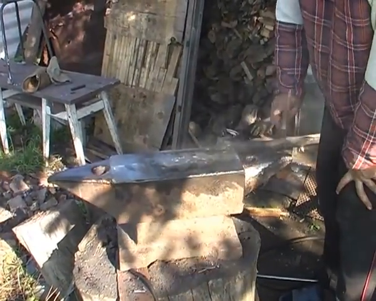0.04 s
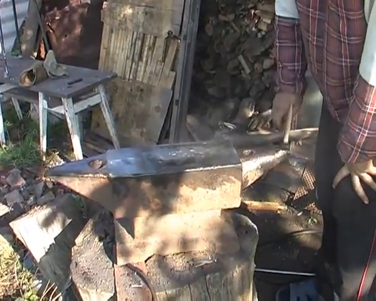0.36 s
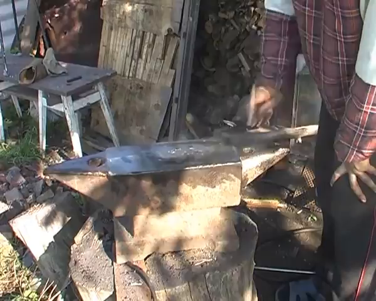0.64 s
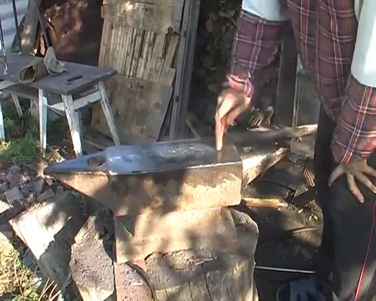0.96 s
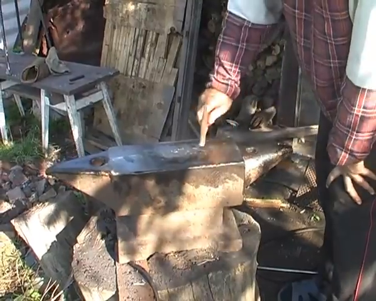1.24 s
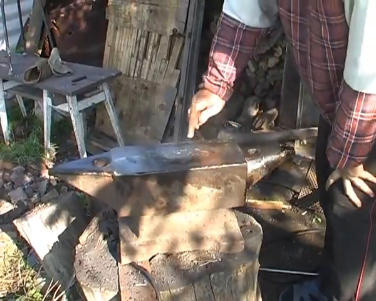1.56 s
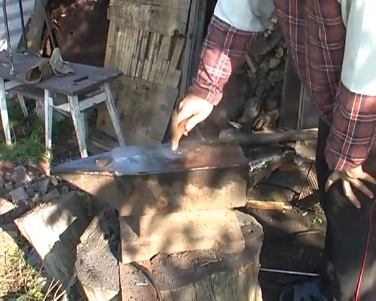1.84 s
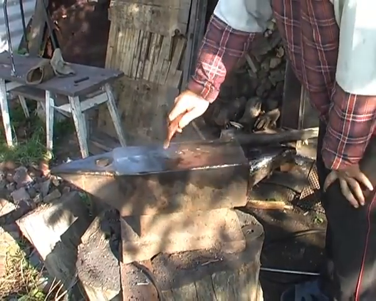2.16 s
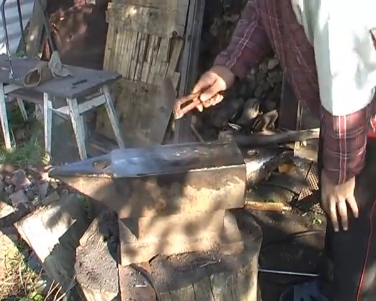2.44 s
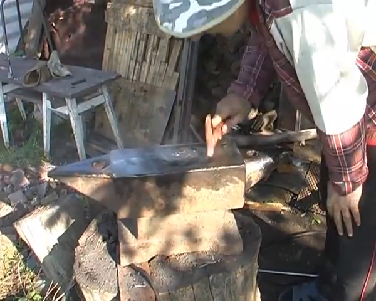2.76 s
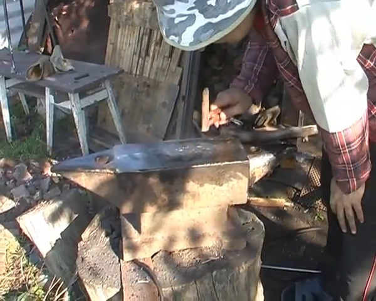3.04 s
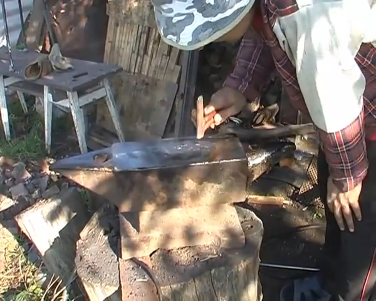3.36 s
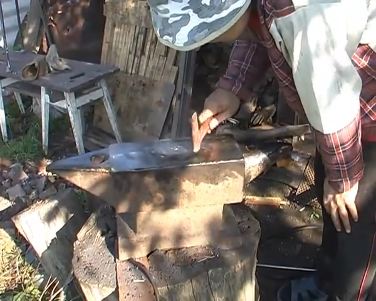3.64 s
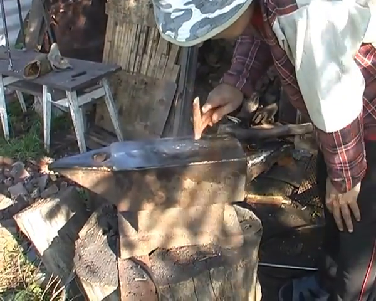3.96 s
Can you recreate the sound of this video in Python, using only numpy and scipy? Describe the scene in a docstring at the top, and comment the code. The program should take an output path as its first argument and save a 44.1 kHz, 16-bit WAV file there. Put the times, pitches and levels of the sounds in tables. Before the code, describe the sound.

Steel tool tapping repeatedly on an anvil outdoors, each sharp tick leaving a high ring.

```python
"""An anvil in a yard, tapped with a hand-held steel tool, first on the thin heel, then on the face.
Each tap gives a tick, a short clank and a long ring whose mix depends on the spot that is struck.
The taps briefly overload the recorder: its gain ducks and recovers, so the ring swells after the hit.
Behind them lie outdoor air, the faint rustle of the smith shifting about and one soft footfall."""
import sys
import numpy as np
from scipy import signal
from scipy.fft import rfft, irfft
from scipy.io import wavfile
from scipy.ndimage import minimum_filter1d

SR = 44100
rng = np.random.default_rng(int(sys.argv[2]) if len(sys.argv) > 2 else 0)


def log_audio(samples):
    """Write samples as a 16-bit WAV file to the path given in sys.argv[1]."""
    # one column per channel
    frames = np.atleast_2d(samples).T
    # limit to full scale, then quantise
    limited = np.clip(frames, -1, 1)
    pcm = np.round(limited * 32767).astype(np.int16)
    wavfile.write(sys.argv[1], SR, pcm)


N = 176400
PRE_ROLL = SR // 5   # samples ahead of time zero, so the scene opens on a ringing anvil
TOTAL = N + PRE_ROLL
TIME = (np.arange(TOTAL) - PRE_ROLL) / SR

# The taps. Each row: start in seconds, then the drive in dB of the tick and of the mode groups
# hum, whine, chime, shimmer, clang, clank, knock and ping.
TAPS = [ (-.085, -3, -9.5, -13, -15, -33.5, 4, -14, -30, -16),
        (0.1888, -0.5, -5.5, -10.5, -12, -26.5, 2, -12, -38, -16),
        (0.4412, 0.5, -6, -12, -11.5, -28.5, 3, -17, -18.5, -18),
        (0.7818, -9, -15.5, -14.5, -10, -44, -18, -13.5, -12.5, -10),
        (1.019, -7.5, -34.5, -20.5, -14.5, -52, -23.5, -16, -9, -16.5),
        (1.2421, -7, -38.5, -37, -12, -41, -18, -11, -10, -16),
        (1.4665, -10, -29.5, -35, -13.5, -55, -18.5, -12, -12, -13.5),
        (1.7059, -7, -27, -29, -18.5, -45, -27, -15.5, -13.5, -22.5),
        (1.923, -6.5, -30, -27, -19.5, -40.5, -38, -13, -10, -22),
        (2.1451, -4, -27.5, -25, -18, -31.5, -25, -7.5, -11.5, -16),
        (2.834, -7.5, -34.5, -33, -13, -46, -21, -14.5, -15.5, -15.5),
        (3.217, -8.5, -29, -42, -11.5, -38, -22, -11.5, -17.5, -21.5),
        (3.4741, -6.5, -26.5, -30.5, -18.5, -39, -21.5, -15.5, -16.5, -39),
        (3.6719, -4.5, -24.5, -26.5, -13, -36.5, -21.5, -15, -21.5, -9),
        (3.8869, -2.5, -26, -30, -13.5, -46, -20, -11.5, -16.5, -11.5)]
# Modes of anvil and tool, grouped as they are driven together.
# Each row: pitch in Hz, level in dB added to the group's drive, time to fall 60 dB in seconds.
STEEL_MODES = { "hum": [(2510.7, 1.5, 1), (5932, -4, 1.32)], "whine": [(5086, 0, 1.3), (5020, -15, 0.92),
               (6323, -22, 0.65)], "chime": [(5533.6, -0.5, .48), (5566, -6, .25), (8903, -13.5, 0.26),
               (8300, -27, 0.16), (10893, -19, 0.27), (12900, -25, 0.26)], "shimmer": [(2720, -1, 1.19),
               (9226, 1, 0.54), (9337, 0.5, 0.52)], "clang": [(3013, 0.5, 0.2), (4460, -10.5, 0.2),
               (4600, -41, 0.52), (11023, -12.5, 0.11), (6980, -18, 0.23)], "clank": [(4734, 3.5, 0.16),
               (6943, 0.5, .15), (4265, -6, 0.15), (4782, -3, 0.14), (1411, -13, 0.19), (3500, -16, 0.17),
               (7200, -5.5, .16), (9300, -14.5, 0.21), (9840, -12.5, 0.14), (13060, -18, 0.16)],
               "knock": [(2025, 1, 0.091)], "ping": [(7993, 4, 0.065), (8170, -13.5, 0.36)]}
# High overtones, in a new mix at every tap. Each row: pitch in Hz, level in dB added to the tick's drive.
OVERTONES = [(6650, -30), (6790, -31), (7738, -32), (8039, -37), (9065, -36.5), (10125, -32), (10460, -36),
             (11480, -43), (12050, -30), (13120, -40), (14300, -43)]
# Noise colours. Each row: frequency in Hz, relative spectral density in dB.
TICK_COLOUR = [(60, -29.5), (300, -31), (600, -30), (900, -12), (1200, 2), (1650, -18), (2300, 5),
               (3500, -1), (5500, -11), (9000, -1.5), (12000, -10), (16000, -33.5)]
YARD_ECHO_COLOUR = [(100, -20), (600, -13.5), (1200, -6.5), (2300, -1.5), (4700, 1.5), (8000, -7.5),
                    (11000, -13), (16000, -36)]
AIR_COLOUR = [(25, -3.5), (60, -1.5), (120, -4.5), (260, 1.5), (500, -2.5), (1000, -7.5), (2000, -14),
              (5000, -7), (9000, -12.5), (13000, -23), (16000, -46)]
RUSTLE_COLOUR = [(100, -37), (300, -5.5), (800, -9), (1500, -4), (2600, -9), (5000, -10), (9000, -18),
                 (15000, -35)]
# The rise and fall of the smith's rustling. Each row: time in seconds, level in dB.
RUSTLE_FADER = [(0, -45), (.38, -38), (.55, -42), (.72, -44), (1.3, -48.5), (1.45, -40), (1.58, -37.5),
                (1.85, -45), (2.2, -54.5), (2.8, -48.5), (3.08, -45), (3.3, -51.5), (4, -50.5)]
# Stereo width of the noises. Each row: frequency in Hz, side level against mid in dB.
STEREO_WIDTH = [(100, -35), (3000, -49), (6000, -31.5), (10000, -4.5)]


def from_db(db):
    """Decibels to gain."""
    return 10 ** (np.asarray(db) / 20)


def decay(age, t60):
    """An envelope that opens at age zero and falls 60 dB in t60 seconds."""
    return (age >= 0) * np.exp(-np.log(1000) * np.clip(age / t60, 0, 10))


def smooth(x, seconds):
    """One-pole low-pass."""
    pole = np.exp(-1 / (seconds * SR))
    return signal.lfilter([1 - pole], [1, -pole], x)


def eq_gain(curve, hz):
    """Gain of an EQ curve drawn on a log-frequency axis."""
    points_hz, points_db = np.transpose(curve)
    return from_db(np.interp(np.log(hz + 1), np.log(points_hz), points_db))


def noise(colour):
    """Coloured stereo noise of rms 1, nearly mono below the high treble."""
    hz = np.fft.rfftfreq(TOTAL, 1 / SR)
    mid, side = rfft(rng.standard_normal((2, TOTAL))) * eq_gain(colour, hz)
    stereo = irfft(mid + side * eq_gain(STEREO_WIDTH, hz) * [[1], [-1]], TOTAL)
    return stereo / stereo.std()


def contact_ticks(rise_s=0.0009, tick_t60_s=0.025, echo_t60_s=0.21, echo_db=-16.5):
    """The crack of steel on steel, with a faint tail scattered back by sheds and woodpile."""
    crack, tail = np.zeros((2, TOTAL))
    for start_s, drive_db, *_ in TAPS:
        start = int(start_s * SR) + PRE_ROLL
        age = np.arange(TOTAL - start) / SR
        attack = from_db(drive_db) * np.minimum(age / rise_s, 1)
        crack[start:] += attack * decay(age, tick_t60_s)
        tail[start:] += attack * decay(age, echo_t60_s)
    return crack * noise(TICK_COLOUR) + from_db(echo_db) * tail * noise(YARD_ECHO_COLOUR)


def struck_mode(hz, t60, levels_db, scatter_db=0, pan_db_per_khz=0.16, grip_cycles=0.54):
    """One mode of the steel: each tap stops the old vibration and sets it ringing anew."""
    starts = np.append((np.array(TAPS)[:, 0] * SR).astype(int) + PRE_ROLL, TOTAL)
    ring = np.zeros((2, TOTAL))
    for start, end, db in zip(starts, starts[1:], levels_db):
        scatter, pan, polarity, grip = rng.standard_normal(4)
        age = np.arange(end - start) / SR
        pan_db = pan * pan_db_per_khz * hz / 1000 * np.array([[.5], [-.5]])
        detune_hz = grip * grip_cycles / t60   # the grip shifts strongly damped modes most
        tone = np.sign(polarity) * np.cos(2 * np.pi * (hz + detune_hz) * age)
        ring[:, start:end] = from_db(db + scatter_db * scatter + pan_db) * tone * decay(age, t60)
    return ring


def waver(depth_db=1.3, swing_s=0.03):
    """A slight random wobble in the level of a ring."""
    swings = from_db(depth_db * rng.standard_normal(TOTAL // 100))
    return np.interp(np.arange(TOTAL) / (swing_s * SR), np.arange(len(swings)), swings)


def anvil_ring(overtone_t60_s=0.27):
    """Anvil and tool vibrate: wavering main modes, topped by overtones that follow the tick's strength."""
    _, tick_db, *group_drives_db = np.transpose(TAPS)
    ring = np.zeros((2, TOTAL))
    for drive_db, modes in zip(group_drives_db, STEEL_MODES.values()):
        for hz, db, t60 in modes:
            ring += struck_mode(hz, t60, drive_db + db) * waver()
    for hz, db in OVERTONES:
        ring += struck_mode(hz, overtone_t60_s, tick_db + db, scatter_db=6.5)
    return ring


def outdoor_air(level_db=-48.5):
    """A steady, quiet bed of open air."""
    return from_db(level_db) * noise(AIR_COLOUR)


def smith_rustle(roughness_db=1.5, grain_s=0.0081):
    """The smith shifts about: soft swells of noise with a fluttering grain."""
    flutter = smooth(rng.standard_normal(TOTAL), grain_s)
    fader_db = np.interp(TIME, *np.transpose(RUSTLE_FADER))
    return from_db(fader_db + roughness_db * flutter / flutter.std()) * noise(RUSTLE_COLOUR)


def footfall(start_s=2.458, level_db=-34.5, thud_hz=241, t60_s=0.13, scuff_db=-6):
    """A foot lands: a low thud with a little scuff."""
    age = TIME - start_s
    thud = np.sin(2 * np.pi * thud_hz * age)
    scuff = from_db(scuff_db) * noise(AIR_COLOUR)
    return from_db(level_db) * decay(age, t60_s) * (thud + scuff)


def gain_control(mix, threshold_db=-18, slope=0.87, attack_s=0.0056, hold_s=0.012, release_db_per_s=137):
    """Loud hits pull the gain down within milliseconds; it holds, then climbs back at a steady rate."""
    power = smooth(np.mean(mix ** 2, axis=0), seconds=0.003)
    level_db = 10 * np.log10(power + 1e-12)
    half_hold = int(hold_s * SR / 2)
    peak_db = -minimum_filter1d(-level_db, 2 * half_hold + 1, origin=half_hold, mode="nearest")
    target_cut_db = slope * np.maximum(peak_db - threshold_db, 0)
    climb_db = release_db_per_s * TIME
    cut_db = np.maximum.accumulate(target_cut_db + climb_db) - climb_db   # limits the speed of recovery
    return mix * from_db(-smooth(cut_db, attack_s))


def scene():
    """Taps and yard, ducked together by the gain control, with the pre-roll trimmed off."""
    mix = anvil_ring() + contact_ticks() + outdoor_air() + smith_rustle() + footfall()
    return gain_control(mix)[:, PRE_ROLL:]


def record(dry, ceiling=0.69, low_cut_hz=60, high_cut_hz=17200):
    """Overloaded peaks are soft-clipped, then the deep bass and the very top are cut."""
    clipped = dry / (1 + (dry / ceiling) ** 6) ** (1 / 6)
    low_cut = signal.butter(2, low_cut_hz, "high", fs=SR, output="sos")
    high_cut = signal.cheby2(14, 80, high_cut_hz, fs=SR, output="sos")
    return signal.sosfilt(high_cut, signal.sosfilt(low_cut, clipped))


dry = scene()
out = record(dry)
log_audio(out)
```